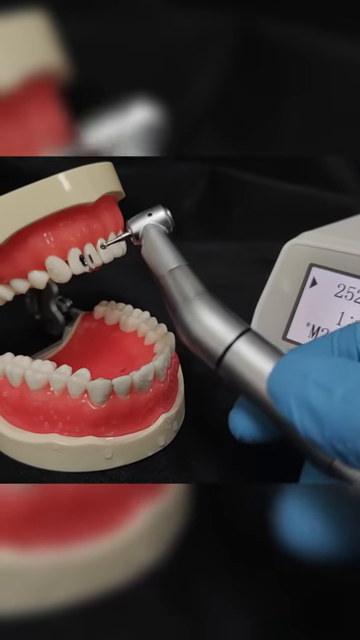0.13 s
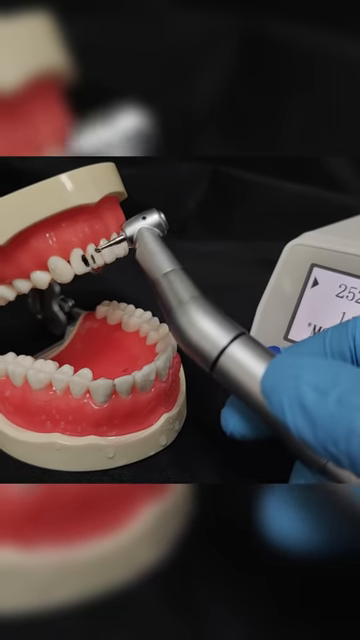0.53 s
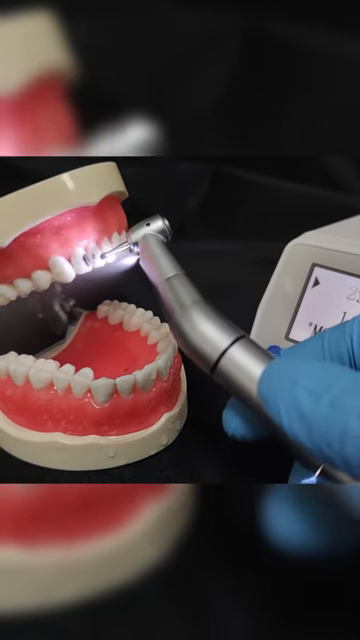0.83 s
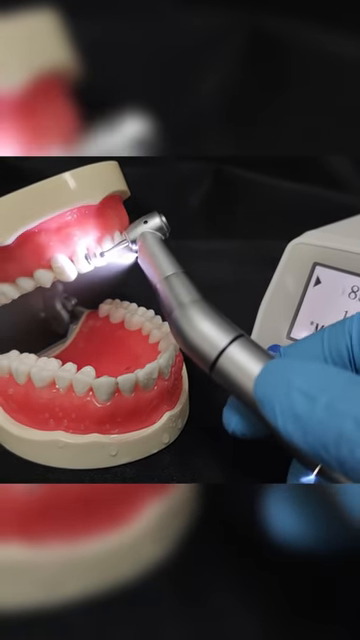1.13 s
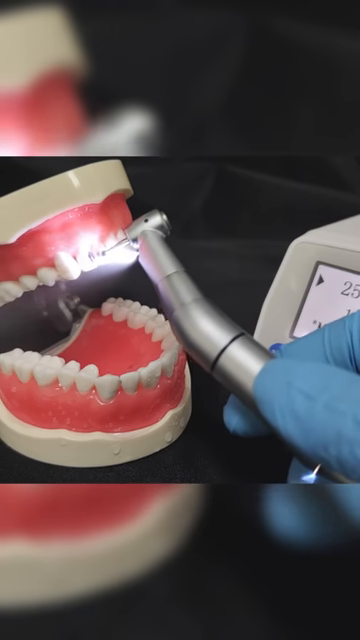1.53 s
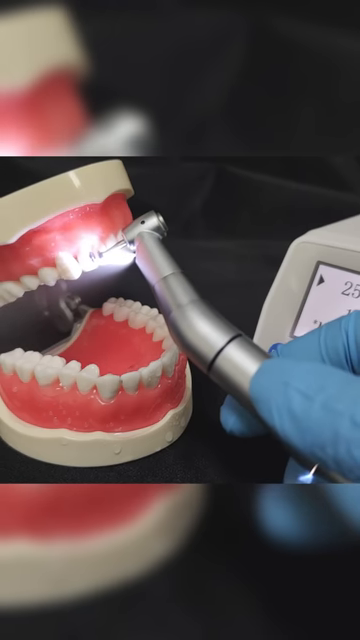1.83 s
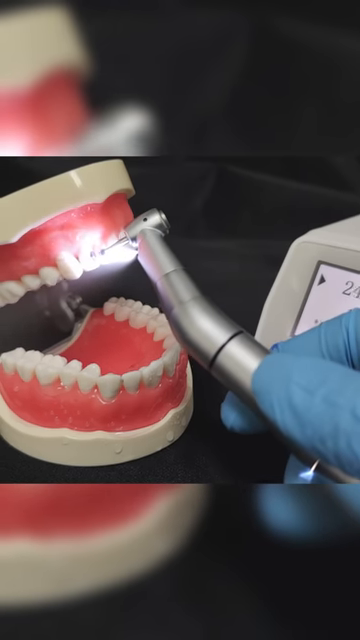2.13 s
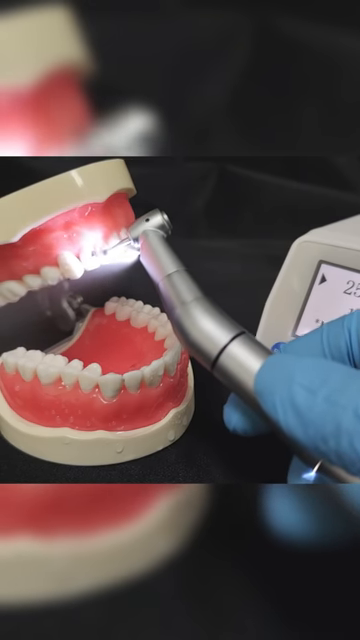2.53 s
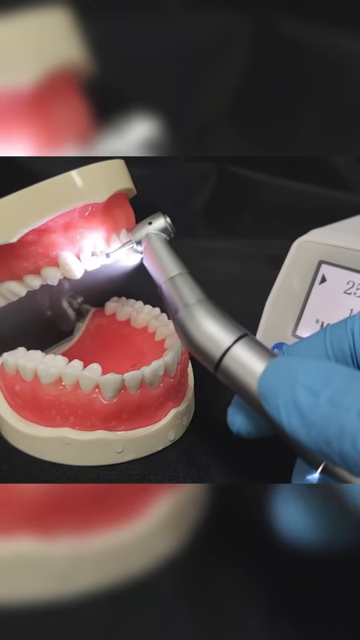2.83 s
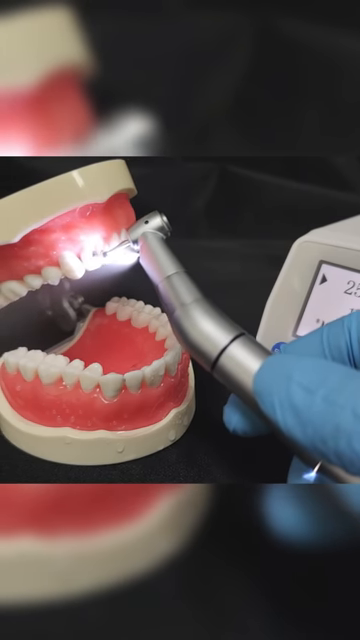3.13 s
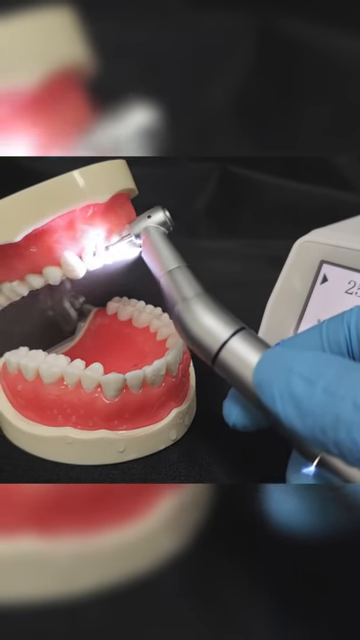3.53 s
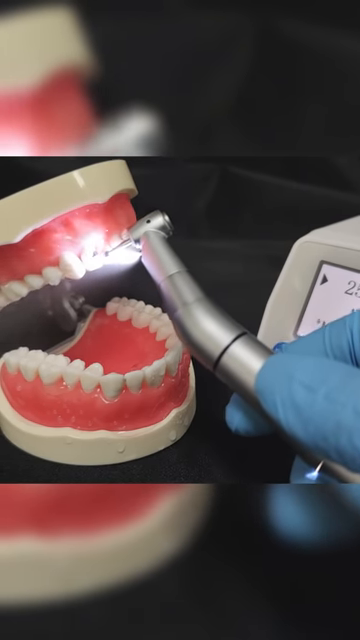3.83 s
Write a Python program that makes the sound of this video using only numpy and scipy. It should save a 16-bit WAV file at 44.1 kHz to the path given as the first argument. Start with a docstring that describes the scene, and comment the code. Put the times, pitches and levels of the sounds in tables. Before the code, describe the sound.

Quiet low rumble and tiny handling sounds come first; then a dental handpiece rises abruptly into strong, steady high hiss and whirr, with short irregular buzzing touches on a tooth model, close to two differing microphones.

```python
"""An electric dental handpiece starts up in a quiet room, close to two unlike microphones.
Cooling air hisses first, then motor and gears whirr: shaped noise, partly shared by the two sides.
Each touch of the bur on a tooth model sounds the turning rate as sines, strongest at the eighth multiple.
Faint handling knocks are decaying modes; rustles are dying noise; room tone, rumble and hum lie below."""
import sys
import numpy as np
from scipy import signal
from scipy.fft import rfft, irfft, next_fast_len
from scipy.io import wavfile

SR = 44100
rng = np.random.default_rng(int(sys.argv[2]) if len(sys.argv) > 2 else 0)


def dump_mix(stems):
    """Bounce the given channels to the path in sys.argv[1] as a 16-bit WAV at rate SR."""
    frames = np.atleast_2d(stems).T  # one column per channel
    limited = np.clip(frames, -1, 1)  # hard clip at full scale
    pcm = np.round(limited * 32767).astype(np.int16)
    wavfile.write(sys.argv[1], SR, pcm)


N = 176400

# Rise of the air hiss and of the whirr, each used relative to its median: time_s, level_db
AIR_RISE = [(.5, -95), (.528, -69), (.534, -52.5), (.59, -40), (.62, -39.5), (.665, -21.5), (.69, -21),
            (.75, -18.5), (1, -18), (2, -17.5), (3, -17.5), (4, -18)]
WHIRR_RISE = [(.5, -92), (.53, -78), (.545, -54), (.59, -52), (.62, -39), (.665, -31.5), (.75, -29.5),
              (1, -28), (2, -29), (3, -28), (4, -28.5)]
# Handpiece spectrum at each microphone, before the layer shapes: frequency_hz, density_db_per_hz
RUNNING_LEFT = [(430, -78.9), (600, -79.5), (1030, -77.1), (1460, -73.1), (1720, -69.1), (2070, -72.0),
                (2240, -69.6), (2410, -70.3), (2670, -64.5), (3100, -65.0), (3270, -68.0), (3700, -63.6),
                (4130, -66.5), (5250, -66.3), (5510, -70.5), (5860, -66.2), (6720, -62.8), (6800, -60.4),
                (7240, -56.4), (7490, -56.4), (7670, -50.3), (7920, -47.7), (8270, -50.3), (8440, -49.3),
                (9040, -55.1), (9300, -53.2), (9990, -56.6), (10510, -54.7), (11020, -57.4), (11460, -55.6),
                (11710, -49.4), (11890, -48.7), (12230, -49.8), (12400, -53.3), (12750, -52.3),
                (13350, -58.0), (13780, -55.7), (14130, -60.3), (14380, -58.2), (14640, -60.6),
                (14810, -58.6), (15070, -59.5), (15420, -56.6), (15680, -59.2)]
RUNNING_RIGHT = [(430, -78.5), (600, -80.5), (950, -77.8), (1290, -72.4), (1810, -70.1), (2070, -65.7),
                 (2240, -66.8), (2410, -63.4), (2670, -64.2), (2780, -60.5), (2900, -59.5), (3010, -56.6),
                 (3170, -61.5), (3300, -63.5), (3530, -64.1), (3700, -62.4), (4130, -63.9), (4570, -60.6),
                 (4820, -63.8), (5170, -60.2), (5510, -67.0), (5940, -62.8), (6370, -63.2), (7060, -71.5),
                 (7240, -77.7), (7580, -73.8), (7750, -82.8), (8270, -86.4), (8700, -80.0), (8870, -80.5),
                 (9040, -84.0), (9390, -77.5), (9990, -79.8), (10160, -76.9), (10340, -77.2),
                 (10510, -71.4), (10770, -71.8), (11020, -65.8), (11460, -68.2), (11710, -64.6),
                 (11970, -65.9), (12400, -59.3), (12750, -63.3), (13010, -59.0), (13350, -62.2),
                 (13780, -58.6), (14130, -62.2), (14380, -60.2), (15070, -63.6), (15500, -60.8),
                 (15680, -61.7)]
# Left-right likeness of the handpiece noise: frequency_hz, likeness (0 to 1)
RUNNING_ALIKE = [(400, .6), (1100, .45), (1600, .85), (2300, .45), (3000, .6), (3400, .2), (4000, .45),
                 (5200, .5), (6500, .35), (8000, .35), (12000, .55), (15500, .55)]
# Colour of the whirr over the handpiece spectra: frequency_hz, gain_db
WHIRR_COLOUR = [(60, -17), (150, -1), (300, -3), (450, -2), (800, 0.5), (1300, -0.5), (2000, 0.6),
                (3000, -0.42), (5000, -0.7)]
WHIRR_TOP_HZ = 5370  # whirr below, air hiss above
AIR_GAIN_DB = 0.36  # over the handpiece spectra
AIR_FLUTTER_DB, WHIRR_FLUTTER_DB = .35, .65  # rms

# Paths to the right microphone: a direct lag and two bounces off nearby surfaces
RIGHT_LAG_S = 0.00036
# Extra delay of the two bounces: delay_s
BOUNCE_DELAYS = [.0018, .00233]
# First bounce against the direct sound: frequency_hz, level_db
BOUNCE_LEVEL = [(400, -30), (3000, -14), (7000, -8), (10000, 4), (15500, 5)]
# Phase lead at the right microphone: frequency_hz, lead_rad
RIGHT_LEAD = [(300, .6), (700, .85), (1550, .5), (2100, 1.0), (2900, .65), (4300, .35), (5200, -1.1),
              (6000, -2.4), (7000, -2.1)]

# Bur touches, levels before the side gains: start_s, length_s, buzz_db, turning_rate_db
TOUCHES = [(0.762, 0.045, -36, -60), (0.891, 0.052, -38.5, -64), (0.996, 0.038, -39, -69),
           (1.229, .043, -34, -59), (1.444, 0.025, -33.5, -51), (1.506, 0.035, -36.5, -63),
           (1.772, 0.025, -31.5, -61), (1.818, 0.026, -31.5, -51), (1.907, 0.02, -28.5, -42.5),
           (2.129, 0.035, -33, -47.5), (2.21, 0.052, -26.5, -42.5), (2.327, 0.027, -29.5, -48),
           (2.386, 0.052, -35, -48.5), (2.46, 0.075, -31.5, -46.5), (2.555, 0.029, -43.5, -51),
           (2.7, 0.034, -32, -53), (2.793, 0.028, -33, -42), (2.974, 0.061, -38, -54.5),
           (3.053, 0.054, -35.5, -54), (3.329, 0.048, -26, -42), (3.396, 0.071, -31, -42),
           (3.47, 0.069, -31.5, -45.5), (3.594, 0.037, -24.5, -39.5), (3.623, 0.051, -31.5, -45.5),
           (3.754, 0.042, -32, -46.5), (3.85, 0.032, -33.5, -54), (3.94, 0.035, -33.5, -51)]
# Turning rate before sway and load: time_s, speed_turns_per_s
BUR_SPEED = [(.7, 371), (1.0, 373), (1.25, 378), (2.6, 378.5), (2.75, 374.5), (3.0, 372), (3.07, 378),
             (4, 378.5)]
# Multiples of the turning rate, gains on the buzz: multiple, left_db, right_db
BUZZ_MULTIPLES = [(2, -28, -27), (3, -26, -26), (4, -18, -21), (5, -19, -23), (6, -23, -24), (7, -9, -10),
                  (8, -6, 4.5), (9, -18, -10), (12, -15, -9), (14, -16, -12), (17, -10, -10)]
TOUCH_PEAK_AT, TOUCH_SPREAD = 0.31, 1.4  # peak as a share of the length; stretch of both slopes
FREE_BUZZ_DB = -50  # faint buzz between touches, at the median whirr level
BUZZ_WOBBLE_DB, TURN_WOBBLE_DB = 2.2, 2.0  # rms
SPEED_SWAY, SAG_PER_LOAD = .0045, .13  # share of the speed: rms; per unit of buzz amplitude
TURN_PAN_DB, TURN_LAG_S = 2.1, 0.0001  # up on the left and down on the right; lag of the right

# Faint knocks of something handled, before the mode levels: start_s, level_db
KNOCKS = [(0.212, -47), (0.252, -44), (0.362, -49)]
# Ringing modes of a knock: frequency_hz, level_db, t60_s
KNOCK_MODES = [(564, 2.5, 0.041), (720, -19, 0.022), (2520, -12, .065), (2760, -11, 0.044)]
# Soft rustles and a surge as the motor starts, over the room tone before colouring: start_s, level_db
RUSTLES = [(-.02, 13.5), (0.212, 1), (0.253, 5.5), (0.365, 3), (.665, 16.5)]
# Colour of the rustles against the room spectra: frequency_hz, gain_db
RUSTLE_COLOUR = [(200, -38), (450, -13), (600, 2), (800, -8), (1800, -5), (2500, 0), (3300, -3), (4200, -5),
                 (6000, -8), (8200, -5), (12000, -9)]
RUSTLE_T60_S = 0.37

# Room tone and microphone noise, before the bass roll-off: frequency_hz, density_db_per_hz
ROOM_LEFT = [(170, -75.5), (1210, -90.5), (2240, -96.5), (2760, -98), (3270, -101.9), (4130, -99.9),
             (5170, -106.3), (6890, -106.6), (8100, -99.6), (9300, -108.8), (10850, -109.9),
             (11890, -105.1), (12920, -110.8), (15680, -113.1)]
ROOM_RIGHT = [(170, -73), (340, -81), (690, -89), (1210, -85.5), (1550, -90), (2240, -92), (2760, -88),
              (3450, -99.5), (4130, -97), (5000, -101.2), (6370, -103.5), (7240, -111.6), (7920, -113.8),
              (15680, -113.2)]
# Left-right likeness of the room, floored at 0 in use: frequency_hz, likeness
ROOM_ALIKE = [(60, 0.97), (130, 1), (290, 0.91), (640, 0.29), (1410, 0.047), (3100, 0.21), (6820, -0.03),
              (15000, -0.099)]
# Relative rumble spectrum, before roll-offs and scaling: frequency_hz, density_db_per_hz
RUMBLE = [(12, -35), (20, 10), (54, 14), (73, -26), (92, 6), (150, 3), (192, -10), (258, -25.5), (330, -14),
          (430, -40), (730, -120)]
RUMBLE_RMS_DB = -52.5  # both sides together
# Narrow hum bands: frequency_hz, rms_db, half_width_hz
HUMS = [(66, -54.5, 4.0), (199, -56.5, 7.0)]

CUTOFF_HZ, CEILING = 15760, 2.1  # treble limit; soft limit of the amplitude
PAD = next_fast_len(N + 4096)
HZ = np.maximum(np.arange(PAD // 2 + 1) * SR / PAD, 1)  # frequency of each spectral bin


def amp(db):
    """Decibels are twenty times the logarithm of amplitude."""
    return 10 ** (np.asarray(db) / 20)


def rms_one(x):
    """Dividing by the root mean square gives unit effective amplitude."""
    return x / np.sqrt(np.mean(x ** 2) + 1e-20)


def in_time(rows):
    """Linear interpolation turns time points into a value for every sample."""
    time_s, value = np.transpose(rows)
    return np.interp(np.arange(N) / SR, time_s, value)


def over_hz(points):
    """Interpolation on logarithmic frequency turns spectral points into a value for every bin."""
    hz, value = np.transpose(points)
    return np.interp(np.log(HZ), np.log(hz), value)


def drift(rate_hz):
    """Two equal low-pass poles turn white noise into slow fluctuation of unit rms."""
    pole = np.exp(-2 * np.pi * rate_hz / SR)
    noise = rng.standard_normal(N + SR)
    slow = signal.lfilter([1], [1, -2 * pole, pole * pole], noise)
    return rms_one(slow[SR:])  # the first second lets the filter settle


def pair_noise(left, right, alike, path=1, shape=1):
    """Coherence: shared and separate noise mix by power, the shared part reaching the right by a path."""
    shared, own_left, own_right = rfft(rng.standard_normal((3, PAD))) * np.sqrt(SR / 2)
    likeness = np.clip(over_hz(alike), 0, 1)
    common = np.sqrt(likeness) * shared
    apart = np.sqrt(1 - likeness)
    at_left = amp(over_hz(left)) * (common + apart * own_left)
    at_right = amp(over_hz(right)) * (common * path + apart * own_right)
    return irfft(np.array([at_left, at_right]) * shape, PAD)[:, :N]


def right_path():
    """Interference of direct sound and two bounces sets the phase at the right microphone."""
    direct = np.exp(1j * (over_hz(RIGHT_LEAD) - 2 * np.pi * HZ * RIGHT_LAG_S))
    first, second = [np.exp(-2j * np.pi * HZ * delay) for delay in BOUNCE_DELAYS]
    path = direct + amp(over_hz(BOUNCE_LEVEL)) * (first + second / 2)
    return path / np.abs(path)  # phase only: the colour is in the spectra


def running():
    """Broadband noise: air hiss above and motor whirr below a power crossover, each with its own rise."""
    low = 1 / np.sqrt(1 + (HZ / WHIRR_TOP_HZ) ** 12)
    high = np.sqrt(1 - low ** 2)
    path = right_path()
    layers = [(AIR_RISE, amp(AIR_GAIN_DB) * high, AIR_FLUTTER_DB),
              (WHIRR_RISE, amp(over_hz(WHIRR_COLOUR)) * low, WHIRR_FLUTTER_DB)]
    out = 0
    for rise, shape, flutter_db in layers:
        db = in_time(rise)
        gain = amp(db - np.median(db) + flutter_db * drift(26.0))
        out = out + gain * pair_noise(RUNNING_LEFT, RUNNING_RIGHT, RUNNING_ALIKE, path, shape)
    return out


def touch_shape(start, length):
    """A squared-cosine envelope swells and fades with unequal slopes."""
    away = (np.arange(N) / SR - start) / length - TOUCH_PEAK_AT
    slope = np.where(away < 0, TOUCH_PEAK_AT, 1 - TOUCH_PEAK_AT)
    away = away / slope / TOUCH_SPREAD
    return np.cos(np.pi / 2 * np.clip(away, -1, 1)) ** 2


def bur():
    """Harmonic excitation: touches sound multiples of the turning rate, and their load slows the bur."""
    whirr_db = in_time(WHIRR_RISE)
    buzz = amp(FREE_BUZZ_DB + whirr_db - np.median(whirr_db))
    turn = np.zeros(N)
    for start, length, buzz_db, turn_db in TOUCHES:
        shape = touch_shape(start, length)
        buzz += amp(buzz_db) * shape
        turn += amp(turn_db) * shape

    speed = in_time(BUR_SPEED) * (1 + SPEED_SWAY * drift(38.5) - SAG_PER_LOAD * buzz)
    turns = np.cumsum(speed) / SR
    rate = np.median(speed)

    # sqrt(2) turns an rms level into a sine peak
    turn = np.sqrt(2) * turn * amp(TURN_WOBBLE_DB * drift(38))
    turn_left = amp(TURN_PAN_DB) * np.sin(2 * np.pi * turns)
    turn_right = amp(-TURN_PAN_DB) * np.sin(2 * np.pi * (turns - rate * TURN_LAG_S))
    out = turn * np.array([turn_left, turn_right])

    lead = over_hz(RIGHT_LEAD)
    right_turns = turns - rate * RIGHT_LAG_S
    for multiple, left_db, right_db in BUZZ_MULTIPLES:
        start = rng.random()  # starting phase in cycles
        level = np.sqrt(2) * buzz * amp(BUZZ_WOBBLE_DB * drift(28))
        left_phase = 2 * np.pi * (multiple * turns + start)
        right_phase = 2 * np.pi * (multiple * right_turns + start) + np.interp(multiple * rate, HZ, lead)
        out[0] += amp(left_db) * level * np.sin(left_phase)
        out[1] += amp(right_db) * level * np.sin(right_phase)
    return out


def knocks():
    """Modal ringing: each knock excites the same decaying sines, each with a strength of its own."""
    t, out = np.arange(N) / SR, np.zeros(N)
    for start, db in KNOCKS:
        since = np.maximum(t - start, 0)
        for hz, mode_db, t60 in KNOCK_MODES:
            strength_db = db + mode_db + rng.normal(0, 1.8)
            decay = amp(strength_db - 60 * np.minimum(since / t60, 3))
            out += decay * np.sin(2 * np.pi * hz * since) * (since < 3 * t60)
    return out


def rustles():
    """Exponential decay: sudden puffs of coloured noise die away in the room."""
    t, level = np.arange(N) / SR, np.zeros(N)
    for start, db in RUSTLES:
        since = np.maximum(t - start, 0)
        level += amp(db - 60 * since / RUSTLE_T60_S) * (t >= start)
    return level * pair_noise(ROOM_LEFT, ROOM_RIGHT, ROOM_ALIKE, shape=amp(over_hz(RUSTLE_COLOUR)))


def hum():
    """Narrow-band noise: the narrower the resonance, the slower a hum wavers."""
    out = np.zeros(N)
    for hz, db, half_width in HUMS:
        resonance = 1 / (1 + ((HZ - hz) / half_width) ** 2)
        band = irfft(rfft(rng.standard_normal(PAD)) * resonance, PAD)[:N]
        out += amp(db) * rms_one(band)
    return out


def room():
    """Stationary background: room tone, low rumble and wavering hum add as independent noise."""
    tone = pair_noise(ROOM_LEFT, ROOM_RIGHT, ROOM_ALIKE, shape=np.minimum(HZ / 170, 1) ** 2)
    rumble_shape = np.minimum(HZ / 25, 1) ** 2 * np.minimum(200 / HZ, 1) ** 3
    rumble = rms_one(pair_noise(RUMBLE, RUMBLE, ROOM_ALIKE, shape=rumble_shape))
    return tone + amp(RUMBLE_RMS_DB) * rumble + hum()


def scene():
    """Superposition: the sources add at the two microphones."""
    return running() + bur() + knocks() + rustles() + room()


def record(dry):
    """Saturation rounds the peaks, then an elliptic low-pass cuts the treble steeply."""
    rounded = CEILING * np.tanh(dry / CEILING)
    cut = signal.ellip(14, .3, 62, CUTOFF_HZ, fs=SR, output="sos")
    return signal.sosfilt(cut, rounded)


dry = scene()
out = record(dry)
dump_mix(out)
```